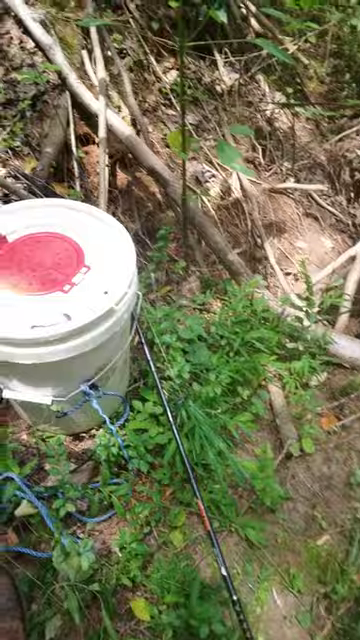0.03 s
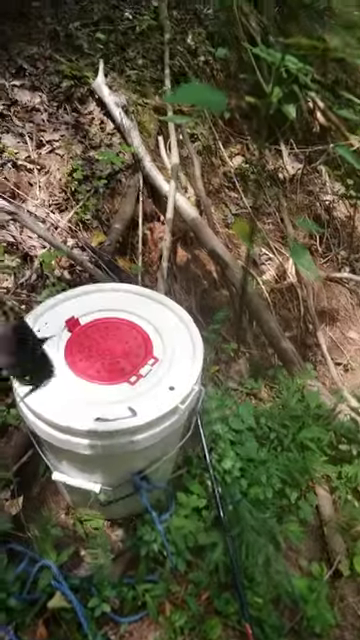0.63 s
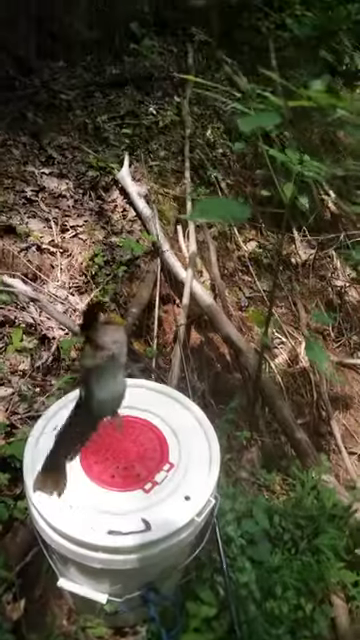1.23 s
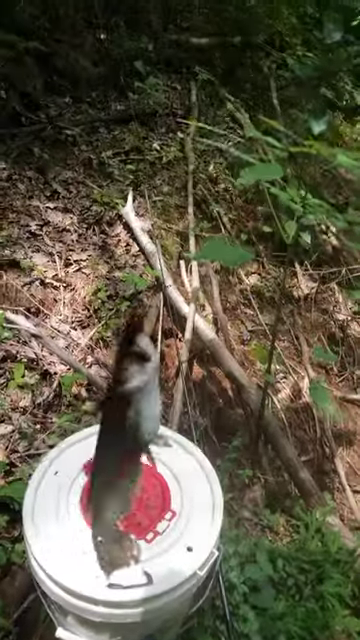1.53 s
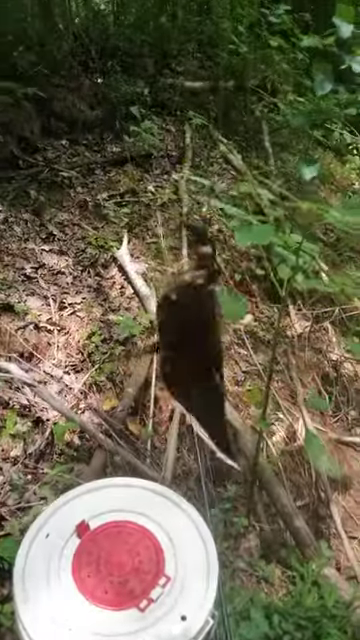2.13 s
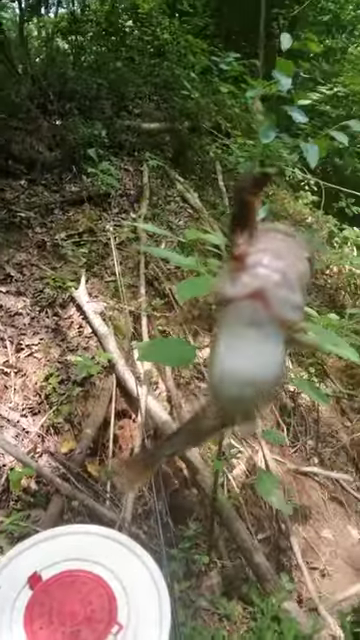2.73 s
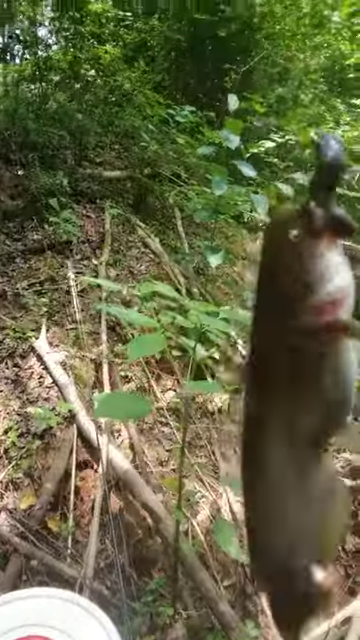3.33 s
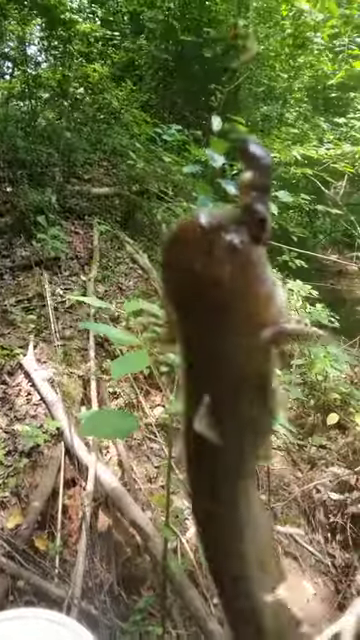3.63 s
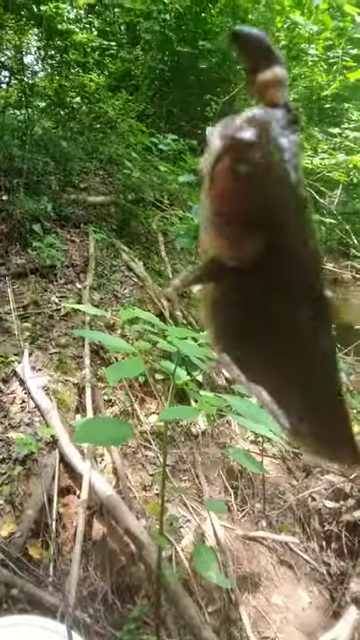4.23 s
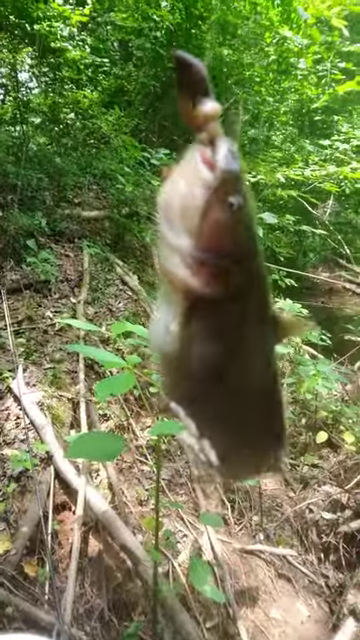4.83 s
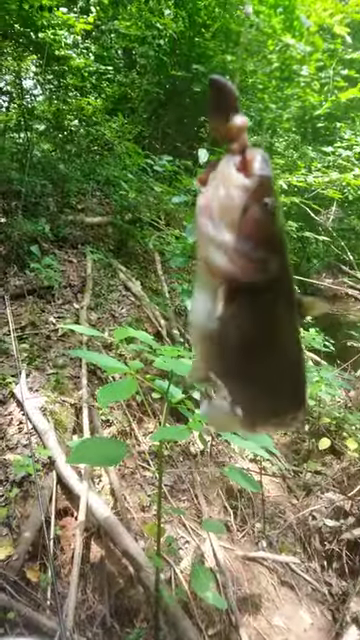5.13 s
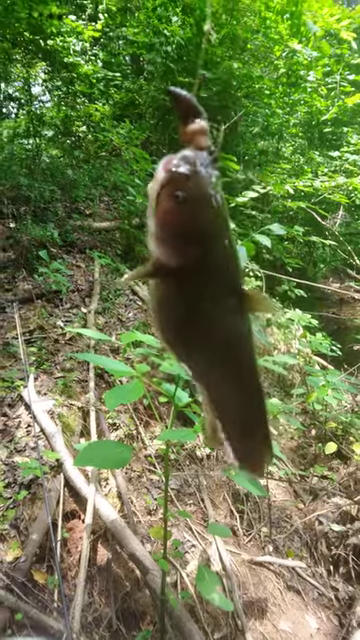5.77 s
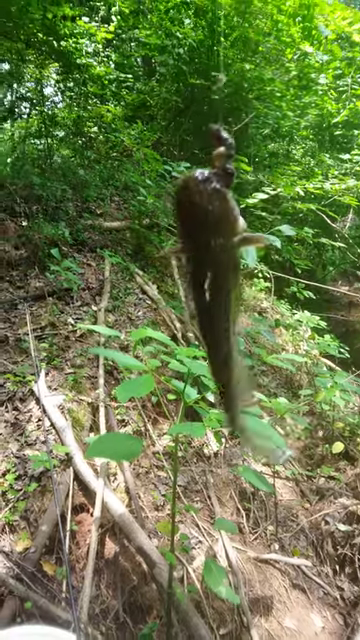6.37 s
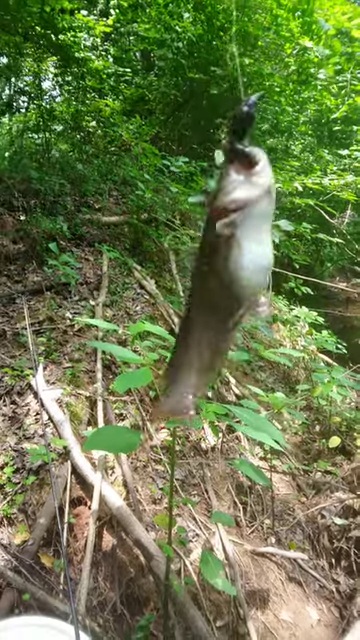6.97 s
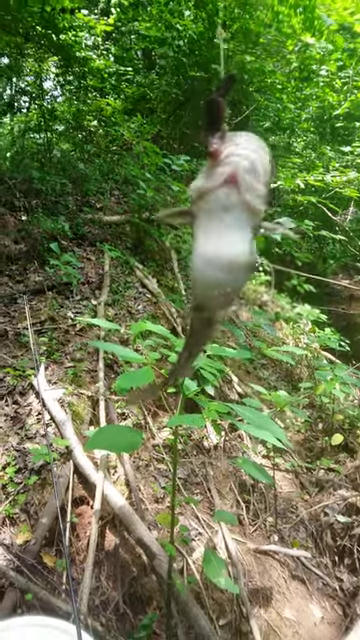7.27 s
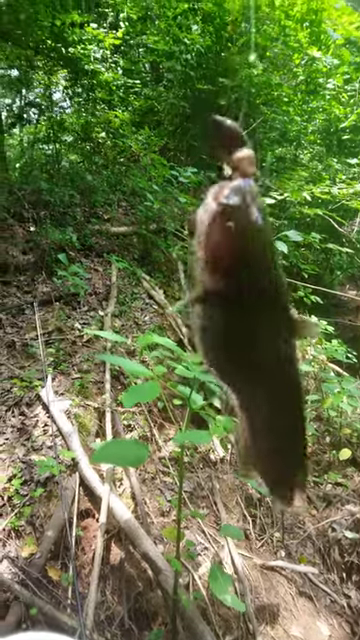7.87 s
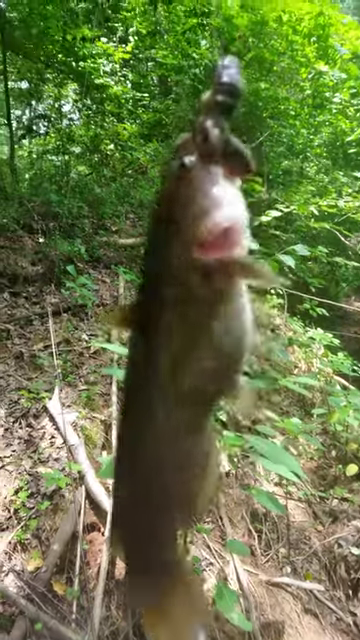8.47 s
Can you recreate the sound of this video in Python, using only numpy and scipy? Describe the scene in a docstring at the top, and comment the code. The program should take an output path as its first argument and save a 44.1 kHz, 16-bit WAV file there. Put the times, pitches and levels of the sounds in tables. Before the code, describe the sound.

A low wind rumble and a soft hiss of woods surround a close handheld microphone on a creek bank. Several small, sharp knocks with a quick bounce and a hollow ring come early, mixed with tiny ticks. Two distant birds follow with thin high whistles and lower slurred notes. Halfway through, the hiss drops away and returns only in spurts, while a hand softly bumps the microphone a few times.

```python
"""A wooded creek bank. Sharp knocks, each with a quick bounce and a hollow ring, excite damped modes;
among them come small ticks and soft bumps of a hand. Two distant birds sing gliding tones that the
trees scatter into echoes. Behind them lie a low rumble, a faint drone, far birdsong, an insect's
whine and the hiss of the woods, which drops away halfway through and returns only in spurts."""
import sys
import numpy as np
from scipy import signal
from scipy.fft import rfft, irfft
from scipy.io import wavfile
from scipy.ndimage import uniform_filter1d

SR = 44100
rng = np.random.default_rng(int(sys.argv[2]) if len(sys.argv) > 2 else 0)


def generate_wav(signal):
    """Clip the signal to [-1, 1] and save it as 16-bit WAV at the path in sys.argv[1]."""
    frames = np.transpose(np.atleast_2d(signal))
    scaled = np.clip(frames, -1, 1) * 32767
    pcm = np.round(scaled).astype(np.int16)
    wavfile.write(sys.argv[1], SR, pcm)


N = 374850
TIME = np.arange(N) / SR
FREQS = np.fft.rfftfreq(N, 1 / SR)
WAKE_S = .397  # the microphone comes on


def knocks(bounce_s=.0164, crack_db=-13.5, grit=.67, phase_spread_rad=1.2, top_hz=8500):
    """Modal ringing: sharp knocks, each with a quick bounce and a hollow ring, excite damped modes."""
    # ringing modes: frequency_hz, level_db, t60_s
    knock_modes = [(1000, -5.5, 0.011), (1180, -15.5, 0.023), (1505, -9.5, 0.05), (1732, -3, 0.027),
                   (2020, -8, 0.024), (2280, -11, 0.03), (2390, -3, 0.018), (2850, 1, 0.0051),
                   (2850, -4, 0.016), (3620, -8, 0.0093), (4150, -12.5, 0.017), (4780, -18, 0.0051),
                   (6700, -19, 0.011), (7600, -7, 0.0021)]
    # knocks: start_s, level_db, tilt_db_per_octave, bounce_relative_db
    impacts = [(.435, -49.5, 2, -0.5), (.651, -45, 0.5, -12), (0.8439, -35.5, -0.7, -4),
               (.944, -48.5, -6.5, -7), (1.3868, -46.5, -1, -16), (1.4354, -53.5, -5, -14),
               (1.985, -53.5, 4, -2.5), (2.132, -52.5, -11, 0), (2.168, -48.5, -5.5, -10),
               (2.209, -55, -8, -12), (2.258, -39.5, -4.5, -12.5), (2.334, -49.5, -5, -5),
               (3.199, -53, -5, -17)]
    out, t = np.zeros((2, N)), np.arange(SR // 5) / SR
    hz, mode_db, t60 = np.transpose(knock_modes)[:, :, None]
    phase = phase_spread_rad * rng.standard_normal((2, len(knock_modes), 1))  # per microphone port
    rings = gain_of(mode_db - 60 * t / t60) * np.sin(2 * np.pi * hz * t + phase)
    hollow_hz, hollow_db, hollow_t60_s = 515, -4, .13
    hollow = gain_of(hollow_db - 60 * t / hollow_t60_s) * np.sin(2 * np.pi * hollow_hz * t)
    for start, db, tilt, bounce_db in impacts:
        body = (rings * gain_of(tilt * np.log2(hz / 1700))).sum(1)
        contact_s = .0051 * 2 ** ((-36.5 - db) / 24)  # halves for each 24 dB harder
        for at, impact_db in [(start, db), (start + bounce_s, db + bounce_db)]:
            force = rng.standard_normal(len(t))
            force *= np.exp(grit * rng.standard_normal(len(t)) - t / contact_s)
            crack = gain_of(crack_db) * rng.standard_normal((2, len(t))) * np.exp(-t / .0012)
            knock = signal.fftconvolve(force[None], body + crack, axes=1)[:, :len(t)]
            onset_rms = np.sqrt(np.mean(knock[:, :SR // 100] ** 2))
            add(out, at, gain_of(impact_db) * knock / onset_rms)
        add(out, start, hollow * gain_of(db - tilt))  # dull knocks ring the hollow most
    return lowpass(out, top_hz)


def bumps(decay_cycles=.53, scuff_db=-2.5, scuff_hz=650):
    """Heavy damping: a hand bumps the camera, giving a cycle or two of thud and a scuff of skin."""
    # pushes of the hand: start_s, level_db, pitch_hz
    pushes = [(3.527, -38, 260), (5.156, -41.5, 221), (6.205, -39.5, 296), (7.169, -37, 235)]
    out, t = np.zeros((2, N)), np.arange(SR // 10) / SR
    for start, db, hz in pushes:
        scuff = unit_rms(lowpass(rng.standard_normal((2, len(t))), scuff_hz))
        thud = np.sin(2 * np.pi * hz * t) + gain_of(scuff_db) * scuff
        add(out, start, gain_of(db) * thud * np.exp(-hz * t / decay_cycles))
    return out


def ticks(width_share=.16, decay_s=.0023):
    """Brief transients: tiny, bright bursts of noise with no ring."""
    # small sharp ticks: start_s, level_db, centre_hz
    snaps = [(1.2447, -57, 6860), (1.274, -64, 7500), (1.333, -63, 7500), (1.7829, -55, 8950),
             (1.995, -63, 9500), (3.046, -57, 6350), (5.2905, -73, 10400), (7.636, -75, 11400)]
    out, t, hz = np.zeros((2, N)), np.arange(4096) / SR, np.fft.rfftfreq(4096, 1 / SR)
    for start, db, centre_hz in snaps:
        band = 1 / (1 + ((hz / centre_hz - 1) / width_share) ** 2)
        fizz = irfft(rfft(rng.standard_normal((2, len(t)))) * band)
        add(out, start, gain_of(db) * unit_rms(fizz) * np.exp(-t / decay_s))
    return out


def whistler(waver_share=.0079, arch_hz=49.7):
    """Two-voiced song: one side of a bird's syrinx glides while the other holds near its own pitch."""
    # high whistles: start_s, length_s, pitch_hz, slide_hz, level_db, rasp_share,
    # second_voice_hz, second_voice_relative_db
    whistles = [(0.559, 0.25, 7720, -550, -69.5, .034, 6960, -2.5),
                (1.712, 0.045, 7300, 0, -72.5, .01, 7000, -6), (2.655, .031, 7380, 500, -72, .02, 6800, -8),
                (2.729, 0.36, 8000, -330, -70, 0.026, 6860, -7),
                (3.353, 0.35, 7820, -900, -68.5, 0.04, 6820, -6),
                (3.924, .32, 7820, -120, -66, .02, 6800, -5),
                (5.489, .22, 6580, -57, -89, 0.0026, 6440, -12),
                (6.782, .341, 7240, -260, -68.5, .0064, 8630, -16.5)]
    out, waver = np.zeros((2, N)), waver_share * wander(160)
    for start, length, hz, slide_hz, db, rasp, second_hz, second_db in whistles:
        add(out, start, note(start, length, hz, slide_hz, arch_hz, db, waver, rasp))
        add(out, start, note(start, length, second_hz, 0, arch_hz, db + second_db, -waver, rasp))
    return tree_echoes(out, t60_s=.5, wet_db=2)


def warbler(waver_share=.01, arch_hz=25):
    """Pitch glides: a second bird slurs short, lower notes from deeper in the wood."""
    # slurred notes: start_s, length_s, pitch_hz, slide_hz, level_db
    slurs = [(2.69, 0.24, 2756, -1, -65), (2.96, 0.065, 2864, 0, -62), (3.05, 0.047, 2720, 0, -61),
             (3.2, 0.14, 2810, 160, -64), (3.35, 0.073, 2700, 282, -59), (3.45, 0.13, 2817, 127, -60),
             (3.83, 0.058, 2840, -150, -64.5), (3.95, 0.093, 2840, -93, -64.5),
             (6.17, 0.187, 2830, -2, -67.5), (6.45, 0.18, 2784, 130, -64), (6.78, 0.064, 2810, -2, -75),
             (6.982, .145, 2770, 172, -64.5), (7.28, 0.103, 2816, 188, -71.5)]
    out, waver = np.zeros((2, N)), waver_share * wander(110)
    for start, length, hz, slide_hz, db in slurs:
        add(out, start, note(start, length, hz, slide_hz, arch_hz, db, waver))
    return tree_echoes(out, t60_s=.4, wet_db=-1)


def note(start_s, length_s, pitch_hz, slide_hz, arch_hz, db, waver, rasp=0):
    """Frequency modulation: a sine slides along a slight arch, wavers, and may fray toward its end."""
    progress = np.linspace(0, 1, max(round(length_s * SR), 64))
    jitter = np.interp(progress, np.linspace(0, 1, 400), rng.standard_normal(400))
    fray = 2 * rasp * progress ** 2 * jitter
    contour_hz = pitch_hz + slide_hz * (progress - .5) - arch_hz * (2 * progress - 1) ** 2
    hz = contour_hz * (1 + waver[round(start_s * SR):][:len(progress)] + fray)
    tone = np.sin(2 * np.pi * np.cumsum(hz) / SR)
    return gain_of(db) * unit_rms(tone * signal.windows.tukey(len(tone), .4))


def tree_echoes(call, t60_s, wet_db, echoes_per_s=2000):
    """Scattering: trunks and leaves return a call as sparse, decaying echoes, unlike at each port."""
    t = np.arange(SR) / SR
    taps = rng.standard_normal((2, SR)) * (rng.random((2, SR)) < echoes_per_s / SR)
    taps *= gain_of(-60 * t / t60_s)
    echoes = signal.fftconvolve(call, taps / np.linalg.norm(taps[0]), axes=1)[:, :N]
    return (call + gain_of(wet_db) * echoes) / np.hypot(1, gain_of(wet_db))


def woods(wash_flutter_db=2.03, hiss_flutter_db=.83):
    """Broadband noise: the bright hiss of the woods flutters over a dull wash that fades late on."""
    # spectra of the hiss and the wash: frequency_hz, density_db
    hiss_spectrum = [(300, -29), (900, 0), (1600, -1), (2400, -2.5), (3000, -5), (3600, -10), (4800, -15.5),
                     (6000, -18), (7200, -16), (8500, -26), (10000, -30), (11500, -43), (15000, -45)]
    wash_spectrum = [(150, -12), (300, -5), (500, -3.5), (900, 0.5), (1500, -4), (2200, -11), (3200, -21.5),
                     (5000, -44), (9000, -56)]
    # envelope of the wash: time_s, level_db
    wash_levels = [(.8, -57), (1.7, -59), (2.2, -57.5), (2.7, -59), (3.9, -58), (5.85, -76), (6.25, -62.5),
                   (6.6, -88), (8.5, -87.5)]
    hiss = air_noise(spectrum(hiss_spectrum)) * hiss_envelope() * gain_of(hiss_flutter_db * wander(30))
    wash = air_noise(spectrum(wash_spectrum)) * envelope(wash_levels)
    return hiss + wash * gain_of(wash_flutter_db * wander(25))


def hiss_envelope(drop_s=4.343, rise_s=.029):
    """Amplitude gating: the hiss holds, drops away, then returns in spurts that swell and end sharply."""
    # the hiss before it drops: time_s, level_db
    held_levels = [(.95, -53.5), (1.6, -58), (2.2, -56.5), (2.7, -58), (3.9, -57.5), (4.33, -61)]
    # spurts of hiss: start_s, end_s, target_db
    spurts = [(4.355, 4.39, -59), (4.427, 4.502, -61.5), (4.532, 4.563, -60), (4.655, 4.7, -62.5),
              (4.722, 4.743, -64), (4.837, 4.88, -62.5), (4.908, 4.929, -63), (5.049, 5.079, -61.5),
              (5.26, 5.296, -61), (5.44, 5.505, -70), (5.512, 5.572, -60), (5.59, 5.622, -62),
              (5.774, 5.79, -60.5), (5.985, 6.002, -58), (6.143, 6.348, -61.5), (6.348, 6.401, -68),
              (6.427, 6.664, -61.5), (6.676, 6.76, -69.5), (6.769, 7.121, -64), (7.133, 7.148, -58),
              (7.273, 7.336, -64.5), (7.33, 7.412, -71)]
    gain = envelope(held_levels) * (TIME < drop_s)
    for start, end, db in spurts:
        inside = (TIME > start) & (TIME < end)
        gain[inside] += gain_of(db) * (1 - np.exp(-(TIME[inside] - start) / rise_s))
    return uniform_filter1d(gain, size=200)


def rumble(lumps_db=.5):
    """Low-frequency noise: an outdoor rumble with a slightly lumpy level."""
    # spectrum of the rumble: frequency_hz, density_db
    rumble_spectrum = [(15, -6.5), (28, 3.5), (42, -4), (70, -2.5), (105, -5), (150, -9.5), (220, -14),
                       (320, -20), (550, -22.5), (900, -23.5), (1300, -34.5), (2000, -42.5), (4500, -54),
                       (15000, -65)]
    # its envelope: time_s, level_db
    rumble_levels = [(.7, -48.5), (1.5, -51), (1.85, -53.5), (2.1, -49), (2.6, -53), (5.2, -52), (8.5, -54)]
    return air_noise(spectrum(rumble_spectrum)) * envelope(rumble_levels) * gain_of(lumps_db * wander(12))


def chorus(song_db=-15, song_floor_db=-93, whine_db=-16.5, fade_db_per_s=4.5):
    """Common modulation: far birdsong and a thin, fading insect whine come and go with the hiss."""
    hiss_gain = hiss_envelope()
    song = far_tone(centre_hz=2813, width_hz=150)
    song *= hiss_gain * gain_of(song_db) + gain_of(song_floor_db)
    whine = far_tone(centre_hz=4730, width_hz=72)
    return song + whine * hiss_gain * gain_of(whine_db - fade_db_per_s * TIME)


def far_tone(centre_hz, width_hz, swell_db=3.3):
    """Spectral broadening: the wood smears a far tone into a narrow, unsteady band of noise."""
    band_db = -20 * np.log10(1 + ((FREQS - centre_hz) / width_hz) ** 4)
    return air_noise(band_db) * gain_of(swell_db * wander(10))


def drone(drift_hz=2.82, swell_db=1.5, rise_s=1.1):
    """Slow modulation: two far, low tones waver; the upper fades while the lower grows slightly."""
    # drone tones: pitch_hz, initial_db, fade_db_per_s
    tones = [(53.45, -58.5, -0.2), (86.5, -54, 0.98)]
    out = np.zeros(N)
    for hz, db, fade in tones:
        cycles = np.cumsum(hz + drift_hz * wander(10.06)) / SR
        amplitude = np.sqrt(2) * gain_of(db - fade * TIME + swell_db * wander(6))
        out += amplitude * np.sin(2 * np.pi * cycles)
    return out * np.clip((TIME - WAKE_S) / rise_s, 0, 1)


def air_noise(spectrum_db, right_delay_s=.000092):
    """Partial coherence: noise at two ports is alike in the bass and nearly unrelated in the treble."""
    # likeness of left and right: frequency_hz, correlation
    port_correlation = [(30, 0.63), (70, 0.91), (150, 0.97), (300, 0.76), (600, 0.73), (1200, -0.25),
                        (2500, -0.14), (12000, 0.077)]
    left, independent = rfft(rng.standard_normal((2, N)))
    likeness = spectrum(port_correlation)
    delayed = left * np.exp(-2j * np.pi * FREQS * right_delay_s)
    right = likeness * delayed + np.sqrt(1 - likeness ** 2) * independent
    return unit_rms(irfft(np.array([left, right]) * gain_of(spectrum_db), N))


def wander(rate_hz):
    """Low-passed noise of unit rms, fluctuating up to about rate_hz."""
    return unit_rms(irfft(rfft(rng.standard_normal(N)) * np.exp(-(FREQS / rate_hz) ** 2), N))


def spectrum(points):
    """Interpolates a table on a log-frequency axis."""
    hz, value = np.transpose(points)
    return np.interp(np.log(FREQS + 1), np.log(hz + 1), value)


def envelope(points):
    """Interpolates decibels over time into a gain curve."""
    return gain_of(np.interp(TIME, *np.transpose(points)))


def lowpass(x, cutoff_hz):
    """Rolls off the treble at 24 dB per octave."""
    return signal.sosfilt(signal.butter(4, cutoff_hz, fs=SR, output="sos"), x)


def gain_of(db):
    """Decibels to amplitude."""
    return 10 ** (np.asarray(db) / 20)


def unit_rms(x):
    """Scales to an rms of one."""
    return x / np.sqrt(np.mean(x ** 2) + 1e-20)


def add(mix, start_s, sound):
    """Mixes a sound in at start_s."""
    part = mix[:, round(start_s * SR):][:, :sound.shape[-1]]
    part += sound[..., :part.shape[1]]


def scene():
    """Superposition: knocks, ticks, bumps, birds and backgrounds sum at the two microphone ports."""
    # opening swell of the noise backgrounds: time_s, gain_db
    swell_in = [(.4, -14), (.52, -6.5), (.64, 0)]
    background = (rumble() + woods() + chorus()) * envelope(swell_in) + drone()
    return background + knocks() + ticks() + bumps() + whistler() + warbler()


def record(dry, balance_db=.16, thud_db=-38.5, thud_peak_s=.068, edge_hz=15700):
    """Switch-on transient: the microphone wakes with a soft, deep push; its bandwidth is limited."""
    awake_s = np.maximum(TIME - WAKE_S, 0)
    fade_in = np.minimum(awake_s / .0052, 1)
    thud = gain_of(thud_db) * awake_s / thud_peak_s * np.exp(1 - awake_s / thud_peak_s)
    port_gains = gain_of([[balance_db], [-balance_db]])
    band_limit = signal.firwin(511, edge_hz, window=("kaiser", 9), fs=SR)
    return signal.oaconvolve((dry * fade_in + thud) * port_gains, band_limit[None], "same")


dry = scene()
out = record(dry)
generate_wav(out)
```